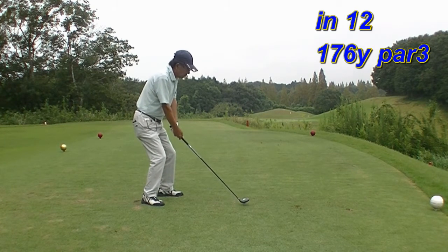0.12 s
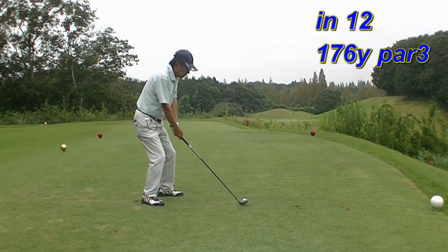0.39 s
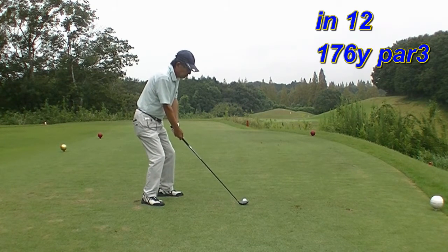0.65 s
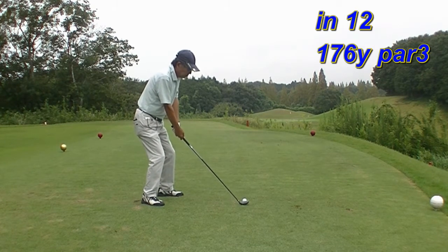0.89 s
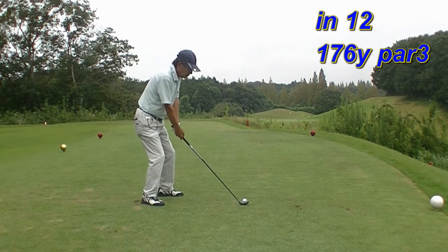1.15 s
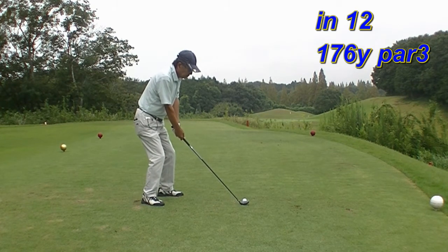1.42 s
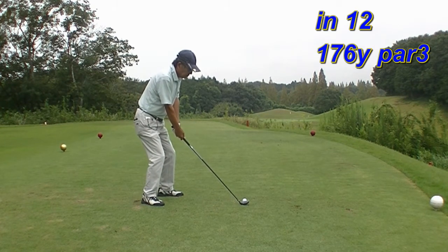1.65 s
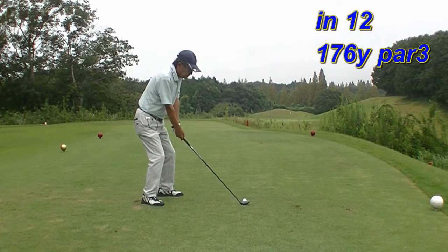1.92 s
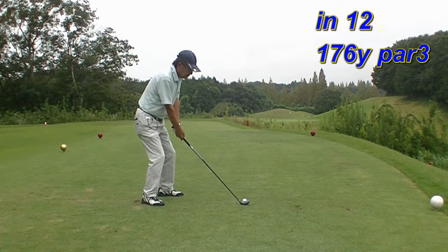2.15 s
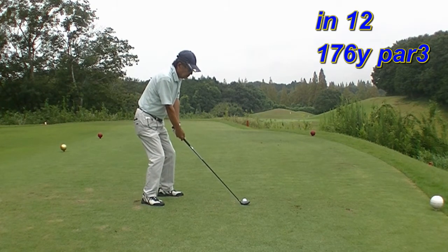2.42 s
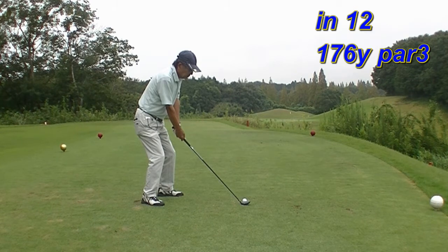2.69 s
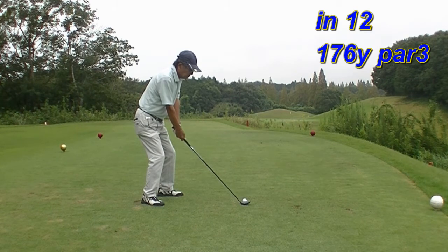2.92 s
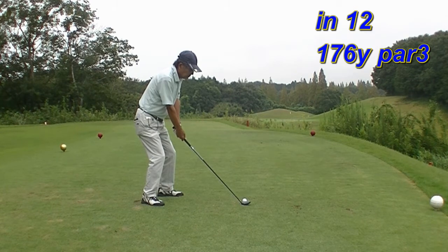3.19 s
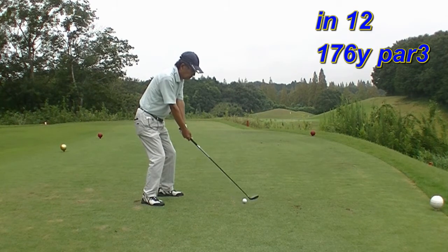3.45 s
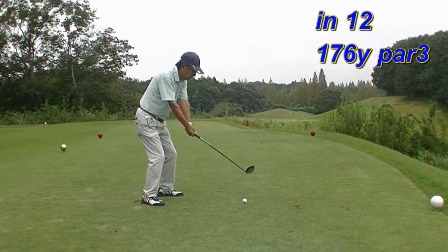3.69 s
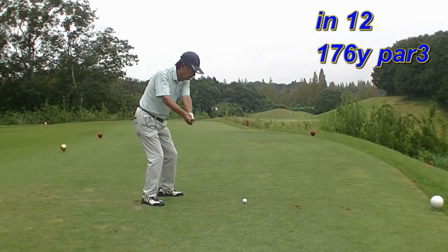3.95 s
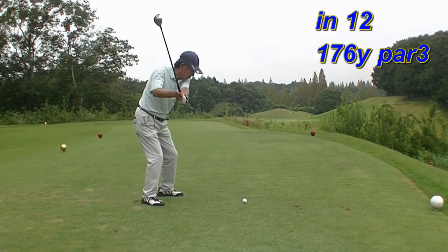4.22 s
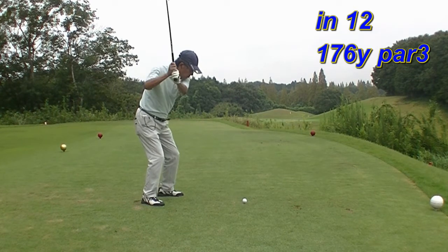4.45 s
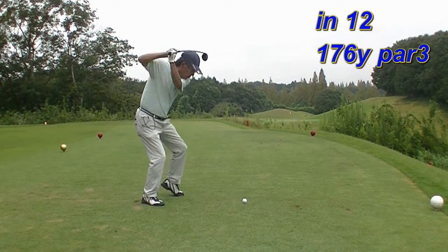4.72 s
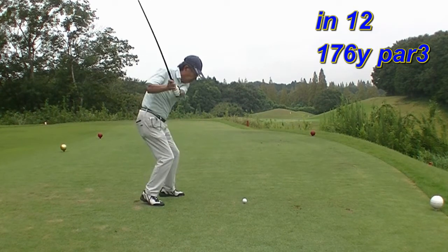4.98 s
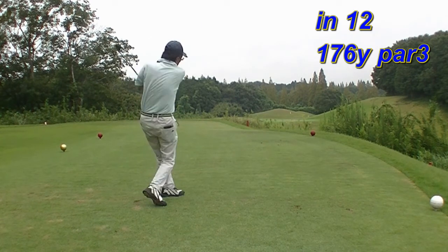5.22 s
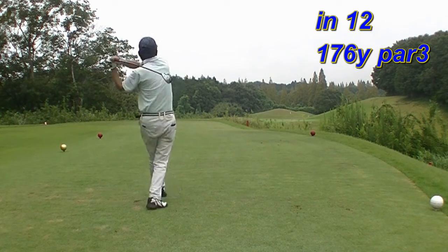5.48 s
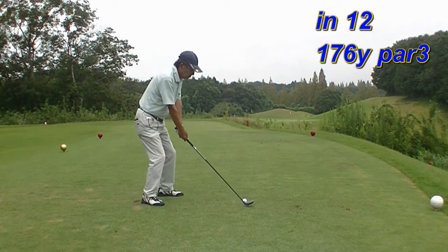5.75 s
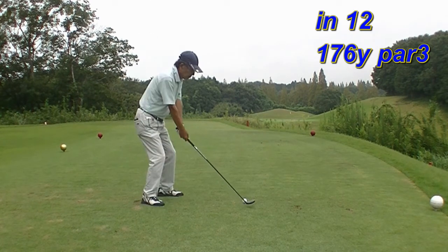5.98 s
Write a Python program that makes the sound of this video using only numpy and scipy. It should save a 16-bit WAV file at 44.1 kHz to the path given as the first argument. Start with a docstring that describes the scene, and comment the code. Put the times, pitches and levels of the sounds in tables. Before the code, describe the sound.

Quiet outdoor insect chirring fills a wide stereo space: blurred distant cicadas, a nearer trilling cricket that starts after a second and stops before the swing, and occasional faint bird chirps. Two loud clicks then come close together, first a hard snap, then a golf club hitting a ball with a brief swish, metal ring and grassy crackle. A grainy reflection from the trees fades before everything cuts off.

```python
"""A broad haze of cicadas opens over soft wind, with four crickets and a distant bird, at a golf tee in summer.
Insects and wind are shaped noise, pulsed tones and a drone; bird and far notes are short glides.
As the club comes down something snaps, squeaks and ticks close by: brief damped modes and a growing tone.
The head swishes, cracks on the ball and rings in decaying modes; noise bursts give turf crackle and the
tree line's scatter. Then everything cuts to silence."""
import sys
import numpy as np
from scipy import signal
from scipy.io import wavfile
from scipy.ndimage import uniform_filter1d

SR = 44100
rng = np.random.default_rng(int(sys.argv[2]) if len(sys.argv) > 2 else 0)


def inscribe(sig):
    """Save sig as 16-bit PCM at rate SR to the path in sys.argv[1].

    A 1-D sig is mono; a 2-D sig holds one channel per row.
    Samples are clipped to [-1, 1] before scaling.
    """
    pcm = np.round(np.clip(np.atleast_2d(sig).T, -1, 1) * 32767)
    wavfile.write(sys.argv[1], SR, pcm.astype(np.int16))


def magnitude_from_level(level_db):
    """Linear magnitude for a level in decibels (20 dB per decade)."""
    exponent = np.asarray(level_db, float) / 20
    return 10 ** exponent


N = 269886  # length in samples
SNAP_S, STRIKE_S, CUT_S = 5.0137, 5.1523, 5.677
BINS_HZ = np.fft.rfftfreq(512, 1 / SR)[:, None]  # the bands of every noise
FRAMES_S = np.arange(N // 128 + 5) * 128 / SR  # and its time steps


def read(points, hz):
    """Reads a spectrum table on a log-frequency axis."""
    f, value = np.transpose(points)
    return np.interp(np.log(hz + 1), np.log(f + 1), value)


def evened(x):
    """Scales to rms 1."""
    return x / np.sqrt(np.mean(x ** 2) + 1e-20)


def add(mix, s, sound):
    """Mixes a two-channel sound in at s seconds."""
    part = mix[:, round(s * SR):][:, :sound.shape[1]]
    part += sound[:, :part.shape[1]]


def drift(span_s, channels=1):
    """Slow random wander of rms 1: noise averaged twice over span_s."""
    span = int(span_s * SR)
    once = uniform_filter1d(rng.standard_normal((channels, N)), span)
    return evened(uniform_filter1d(once, span))


def noise(field_db, same):
    """Two-channel noise of rms 1 from a dB field of bands by frames; same is the left-right likeness."""
    a, b, c, d = rng.standard_normal((len(FRAMES_S), 257, 4)).T
    same = np.clip(same, -1, 1)
    left = a + 1j * b
    right = same * left + np.sqrt(1 - same ** 2) * (c + 1j * d)
    bands = np.array([left, right]) * magnitude_from_level(field_db)
    return evened(signal.istft(bands, nperseg=512, noverlap=384)[1][:, :N])


def tone(hz, level, blur):
    """A sine of the given rms level with a wavering phase per ear."""
    phase = 2 * np.pi * np.cumsum(hz * np.ones(N)) / SR
    return np.sqrt(2) * level * np.sin(phase + blur * drift(0.012, channels=2))


def envelope(shape, blow_s):
    """Fades in, moves at a steady dB rate to its turn, then falls quickly at first and slowly later."""
    start, attack, growth_db, peak, peak_db, knee, fall_db = shape
    t = np.arange(N) / SR - blow_s
    growth = growth_db * np.clip(t - peak, start - peak, 0)
    fall = fall_db * np.log10(1 + np.maximum(t - peak, 0) / knee)
    return np.clip((t - start) / attack, 0, 1) ** 2 * magnitude_from_level(peak_db + growth - fall)


def gust(shape, colour, same):
    """Coloured noise under an envelope around the strike."""
    return envelope(shape, STRIKE_S) * noise(read(colour, BINS_HZ), same)


def dying(t, t60):
    """Metal: struck at once, then exponential decay."""
    return (1 - np.exp(-t / .00014)) ** 2 * magnitude_from_level(-60 * t / t60)


def damped(t, length):
    """A held, soft-backed part: one swell and it is over."""
    return np.sin(np.pi * np.minimum(t / length, 1) ** 0.55) ** 2


def ring(modes, shape, lead, echo_s, echo_db, echo_hz):
    """Modes under their envelopes, plus a duller bounce off the turf."""
    t = np.arange(SR // 3) / SR
    side = np.array([[.5], [-.5]])
    direct = np.zeros((2, len(t)))
    for k, (hz, db, span, pan_db) in enumerate(modes):
        wave = np.sin(2 * np.pi * hz * t + read(lead, hz) * side)
        # neighbouring modes start in opposite sense
        direct += (-1) ** k * magnitude_from_level(db + pan_db * side) * shape(t, span) * wave
    dull = signal.lfilter(*signal.butter(2, echo_hz, fs=SR), direct)
    return direct + magnitude_from_level(echo_db) * np.roll(dull, round(echo_s * SR), axis=1)


# The club head's ring. Each row: pitch in Hz, level in dB, 60 dB decay time in seconds, left minus right in dB.
HEAD = [(240, -29, .011, 5), (2300, -40, 0.043, 0), (4790, -19, 0.007, -2.5), (5920, -32, .06, 0),
        (7065, -22.5, 0.035, 3), (7915, -19.5, 0.035, 0), (10250, -26.5, .025, -4),
        (11725, -29.5, .07, -4.5), (12300, -29, .025, -1.5), (15265, -20, .016, 2)]
# The crack while ball and face touch. Each row: pitch in Hz, level in dB, length in seconds, left minus right in dB.
CRACK = [(550, -30, .0025, 1), (2050, -17.5, .0012, -.5), (4200, -24, .001, -1), (7750, -5, .0013, 1.5),
         (11700, -13.5, .0011, -2), (14300, -23, .0008, 1)]
# Stereo phase of both. Each row: frequency in Hz, lead of the left in radians.
HEAD_LEAD = [(200, 2.5), (800, 1.5), (2000, 0.35), (8000, .6), (15000, .8)]


def strike():
    """Impact drives very short damped contact modes and the longer modes of the metal head."""
    out = np.zeros((2, N))
    add(out, STRIKE_S, ring(HEAD, dying, HEAD_LEAD, 0.0013, -16, 9000))
    add(out, STRIKE_S, ring(CRACK, damped, HEAD_LEAD, 0.0013, -10, 9000))
    return out


# The longest ring. In order: start in seconds from the strike, attack in seconds, slope to the turn in dB per
# second, turn in seconds from the strike, level there in dB, knee in seconds, fall in dB per decade.
SING = (.012, .005, -100, .025, -34, .004, 22)
SING_HZ, SING_HZ_PER_S = 5960, 1500


def sing():
    """The longest ring, heard as the face swings round: a tone that glides up for a tenth of a second."""
    since_s = np.clip(np.arange(N) / SR - STRIKE_S, 0, .1)
    return tone(SING_HZ + SING_HZ_PER_S * since_s, envelope(SING, STRIKE_S), .22)


# The swish's envelope. In order: start in seconds from the strike, attack in seconds, growth in dB per second,
# peak in seconds from the strike, peak in dB, knee in seconds, fall in dB per decade.
SWISH = (-.062, .02, 600, -.004, -39, .03, 62)
# Its colour. Each row: frequency in Hz, relative density in dB per Hz.
SWISH_COLOUR = [(60, -6), (170, 4), (450, 2), (900, -3), (2000, -2.5), (6000, -5), (16000, -7)]
# Its width. Each row: frequency in Hz, left-right likeness from -1 to 1.
SWISH_SAME = [(100, -.7), (400, -.3), (1500, .45), (15000, .45)]


def swish():
    """Air torn by the club: noise that grows steeply into the strike."""
    return gust(SWISH, SWISH_COLOUR, read(SWISH_SAME, BINS_HZ))


# The snap, hard and dry. Each row: pitch in Hz, level in dB, length in seconds, left minus right in dB.
SNAP = [(220, -39, 0.005, 7.5), (2400, -27, .0016, 3), (3370, -14, 0.0026, 4.5), (4430, -12, 0.0026, -3.5),
        (7680, -4.5, 0.0012, 2.5), (11300, -23, .001, -2), (14600, -33, .003, 0.5)]
# Stereo phase of snap and ticks. Each row: frequency in Hz, lead of the left in radians.
SNAP_LEAD = [(300, 2.49), (2000, 0.295), (4400, 0.44), (8000, .3), (15000, .9)]


def snap():
    """Something snaps close by: heavily damped modes, each over in milliseconds."""
    out = np.zeros((2, N))
    add(out, SNAP_S, ring(SNAP, damped, SNAP_LEAD, 0.0037, -15, 2800))
    return out


# The squeak's envelope. In order: start in seconds from the snap, attack in seconds, growth in dB per second,
# peak in seconds from the snap, peak in dB, knee in seconds, fall in dB per decade.
SQUEAK = (-.0038, .0008, 2600, .0002, -18, .002, 50)


def squeak():
    """A squeak grows into the snap: one high tone with a slightly wavering phase."""
    return tone(6600, envelope(SQUEAK, SNAP_S), .2)


# Small ticks after the snap. Each row: start in seconds, level in dB.
TICKS = [(5.0398, -61), (5.0745, -25), (5.0894, -35.5), (5.098, -45)]
# Their shared ring. Each row: pitch in Hz, relative level in dB, length in seconds, left minus right in dB.
TICK = [(4000, 1.5, 0.002, 0.96), (2800, -10.5, 0.0018, 0), (6300, -16.5, .002, 0)]


def ticks():
    """One small damped ring, repeated at different strengths."""
    out = np.zeros((2, N))
    tick = ring(TICK, damped, SNAP_LEAD, 0.0032, -15.5, 6000)
    for s, db in TICKS:
        add(out, s, magnitude_from_level(db) * tick)
    return out


# The turf's envelope. In order: start in seconds from the strike, attack in seconds, growth in dB per second,
# peak in seconds from the strike, peak in dB, knee in seconds, fall in dB per decade.
TURF = (0, .001, 100, .001, -26, .012, 65)
# Its colour. Each row: frequency in Hz, relative density in dB per Hz.
TURF_COLOUR = [(500, -19.5), (2500, -10.5), (5000, -3), (7500, -5), (9500, -14.5), (12000, -8.5),
               (16000, -14.5)]


def turf():
    """Crackle of grass and tee: a noise burst that falls fast, then lingers."""
    return gust(TURF, TURF_COLOUR, .4)


# The tree line's envelope. In order: start in seconds from the strike, attack in seconds, growth in dB per
# second, peak in seconds from the strike, peak in dB, knee in seconds, fall in dB per decade.
TREES = (.066, .006, 110, .1, -40.5, .3, 75)
# Its colour. Each row: frequency in Hz, relative density in dB per Hz.
TREES_COLOUR = [(300, -30), (1500, -14), (3000, -8.5), (5400, -3), (6000, 3.5), (6600, -4), (7400, -1.5),
                (8400, -6.5), (9800, -15.5), (15700, -21.5), (15900, -62)]


def trees():
    """Scatter from the trees: a late noise burst that single trunks make grainy."""
    return magnitude_from_level(2.2 * drift(.002)) * gust(TREES, TREES_COLOUR, .25)


# Near, high, thin and slow crickets. Each row: first stroke in seconds, last stroke in seconds,
# strokes per second, pitch in Hz, peak level in dB.
CRICKETS = [(.958, 4.25, 42.05, 5625, -47.2), (-.0155, 5.7, 37.5, 9050, -61.5),
            (.002, 2.7, 16.25, 7080, -66), (-.0154, 1.4, 16.225, 5500, -57.5)]
# Their wings. Each row: pitch sag in a stroke in Hz, sounding share, skew, unevenness in dB, phase blur in
# radians, left minus right in dB, level change by the end in dB.
WINGS = [(380, .52, .75, .8, .3, 1.5, 1.2), (900, .55, .8, 2.5, 1.8, -1.5, 0),
         (60, 1.0, .9, 2.5, .8, .1, -9), (60, .9, .9, 2.2, .32, .1, -3)]
# A cricket that sets in hurries, then settles; it starts flat and soft.
HURRY_PER_S, SETTLE_S = 2.3, .65  # extra strokes per second at first, settling time
FLAT_HZ, SOFT_DB, WARM_S = 120, -8.5, .3


def cricket(song, wing, sets_in):
    """Each wing stroke is a short tone whose pitch sags; leaves and distance blur its phase per ear."""
    first_s, last_s, per_s, hz, db = song
    sag_hz, share, skew, uneven_db, blur, pan_db, tire_db = wing
    t = np.arange(N) / SR - first_s
    hurry = sets_in * HURRY_PER_S * SETTLE_S * (1 - np.exp(-t / SETTLE_S))
    strokes = per_s * t + hurry
    cold = sets_in * np.exp(-np.maximum(t, 0) / WARM_S)
    which = np.maximum(np.round(strokes).astype(int), 0)
    start = rng.random(300)[which]  # every stroke starts at a phase of its own
    size = rng.standard_normal(300)[which]
    place = np.clip((strokes - which) / share + .5, 0, 1)  # 0 to 1 across one stroke
    stroke = np.sin(np.pi * place ** skew) * (t < last_s - first_s)  # quick rise, slower fall
    pitch_hz = hz - FLAT_HZ * cold + sag_hz * (.5 - place)
    turns = start + np.cumsum(pitch_hz) / SR
    level_db = db + SOFT_DB * cold + tire_db * np.clip(t / (last_s - first_s), 0, 1) ** 3
    level = magnitude_from_level(level_db + uneven_db * size + pan_db * np.array([[.5], [-.5]]))
    return level * stroke * np.sin(2 * np.pi * turns + blur * drift(0.0037, channels=2))


def crickets():
    """Four singers; only the near one sets in, the rest are long under way."""
    return sum(cricket(song, wing, k == 0) for k, (song, wing) in enumerate(zip(CRICKETS, WINGS)))


# A bird's rising whistles. Each row: start in seconds, length in seconds, lowest pitch in Hz, level in dB.
BIRD = [(.356, .02, 2870, -61.5), (.713, .04, 2200, -54.5), (1.488, .03, 2600, -59.5),
        (1.709, .039, 2170, -55), (2.22, .035, 2270, -64), (2.603, .024, 2720, -58.5),
        (2.698, .042, 2100, -58), (3.743, .044, 2080, -59), (4.797, .03, 2280, -56.5),
        (4.854, .02, 2470, -62)]
# Faint far notes that barely rise. Each row: start in seconds, length in seconds, lowest pitch in Hz, level in dB.
NOTES = [(1.777, .089, 2650, -65), (2.83, .07, 3550, -64.5), (2.95, .03, 3780, -62.5),
         (5.565, .055, 1630, -69), (5.576, .036, 390, -66.5)]
BIRD_OCTAVES_PER_S, NOTE_OCTAVES_PER_S, BEND = 13, 2.2, 1.5


def whistles(rows, octaves_per_s, rough=.22):
    """Short upward glides that steepen, smeared by distance."""
    out = np.zeros((2, N))
    for s, length, from_hz, db in rows:
        u = np.linspace(0, 1, int(length * SR))
        pitch_hz = from_hz * 2 ** (octaves_per_s * length * u ** BEND)
        glide = np.sin(2 * np.pi * np.cumsum(pitch_hz) / SR)
        swell = np.sqrt(np.sin(np.pi * u ** 1.5))
        add(out, s, magnitude_from_level(db) * np.sqrt(2) * swell * glide * np.ones((2, 1)))
    return out * (1 + rough * drift(0.0034, channels=2))


# The far chorus. Each row: frequency in Hz, relative density in dB per Hz.
HAZE = [(1000, -38.5), (1450, -20), (1800, -9), (2400, -5.5), (3300, -8), (4400, -8), (5000, -2), (5900, 0),
        (6700, -7.5), (7300, -12.5), (8300, -5.5), (9000, -5), (9350, -13), (9800, -19), (13000, -19.5),
        (15700, -23.5), (15850, -70.5)]
HAZE_DB = -50.5  # rms
# Stereo width of haze and wind. Each row: frequency in Hz, left-right likeness from -1 to 1.
SAME = [(60, -0.05), (130, -0.02), (290, -0.34), (640, -0.52), (1410, -0.11), (3100, 0.42), (6820, 0.44),
        (15000, -0.097)]
# Stereo balance. Each row: frequency in Hz, left minus right in dB.
LEAN = [(60, -3), (180, 0.5), (550, -0.5), (1650, 2), (4970, 0), (15000, -3.5)]
# Swells in the chorus. Each row: centre in seconds, lift in dB, length in seconds, pitch in Hz, width in Hz.
SWELLS = [(.68, 4, .2, 3200, 2500), (1.721, 2.5, .3, 3210, 2510), (2.8, 6, .46, 3900, 700),
          (4.438, 5, .15, 3000, 4000), (4.43, 9.5, .18, 10000, 1500)]
# A thin buzz about once a second. Each row: centre in seconds, lift in dB.
BUZZES = [(1.84, 7.5), (2.84, 9), (3.851, 9), (4.9, 8)]
# Shared by every buzz: length in seconds, pitch in Hz, width in Hz.
BUZZ = (.14, 7650, 800)
# The treble brightens briefly. Each row: centre in seconds, lift in dB.
SHEENS = [(.9, 3.5), (2.222, 6), (2.933, 2), (3.298, 1.5), (3.94, 2), (4.4, 5)]
# Shared by every sheen: length in seconds, pitch in Hz, width in Hz.
SHEEN = (.15, 14000, 4600)


def haze(patchy_db=1.4):
    """Countless far insects blur into patchy noise; single voices swell out of it."""
    grain = rng.standard_normal((len(FRAMES_S), 257))
    patches = evened(uniform_filter1d(uniform_filter1d(grain, 30, 0), 6, 1)).T
    rows = SWELLS + [row + BUZZ for row in BUZZES] + [row + SHEEN for row in SHEENS]
    swell_db = 0
    for s, db, length, mid_hz, width in rows:
        in_time = (2 * (FRAMES_S - s) / length) ** 2
        in_pitch = (2 * (BINS_HZ - mid_hz) / width) ** 2
        swell_db = swell_db + db * np.exp(-in_time - in_pitch)
    lean_db = read(LEAN, BINS_HZ) * np.array([.5, -.5])[:, None, None]
    field_db = read(HAZE, BINS_HZ) + patchy_db * patches + swell_db + lean_db
    return magnitude_from_level(HAZE_DB) * noise(field_db, read(SAME, BINS_HZ))


DRONE_HZ, DRONE_DB = 5085, -70
DRONE_UP_DB, DRONE_TOP_S, DRONE_SWELL_S = 5, 1.7, 1.5


def drone():
    """A thin held tone of wavering phase that swells once."""
    t = np.arange(N) / SR
    swell_db = DRONE_UP_DB * np.exp(-(2 * (t - DRONE_TOP_S) / DRONE_SWELL_S) ** 2)
    return tone(DRONE_HZ, magnitude_from_level(DRONE_DB + swell_db), .9)


# Soft wind. Each row: frequency in Hz, relative density in dB per Hz.
WIND = [(35, -47), (60, -19.5), (221, -3), (394, 2), (629, -3.5), (949, -4.5), (1390, -7), (1600, -5.5),
        (2080, -32.5), (3520, -120)]
WIND_DB = -66  # rms before its slow wander
# The rumble is lumpy and picks up late.
GUST_S, GUST_RISE_S, GUST_DB, LUMPY_DB, RUMBLE_HZ = 4.2, .25, 5, 4, 150


def wind():
    """Low soft rumble from shaped noise, partly opposite in the two microphone ports."""
    lumps = evened(uniform_filter1d(rng.standard_normal(len(FRAMES_S)), 24))
    late_db = GUST_DB * (.5 + .5 * np.tanh((FRAMES_S - GUST_S) / GUST_RISE_S))
    rumble_db = (late_db + LUMPY_DB * (lumps - 1)) / (1 + (BINS_HZ / RUMBLE_HZ) ** 4)
    level = magnitude_from_level(WIND_DB + 1.1 * drift(0.087))
    return level * noise(read(WIND, BINS_HZ) + rumble_db, read(SAME, BINS_HZ))


def scene():
    """The swing among insects, bird and wind."""
    mix = strike() + sing() + swish()
    mix += snap() + squeak() + ticks()
    mix += turf() + trees()
    mix += crickets() + whistles(BIRD, BIRD_OCTAVES_PER_S) + whistles(NOTES, NOTE_OCTAVES_PER_S)
    return mix + haze() + drone() + wind()


def roll_off(x):
    """The treble ends steeply here."""
    return signal.sosfilt(signal.butter(12, 16970, fs=SR, output="sos"), x)


def record(dry):
    """The microphone drops deep bass and the top; the edit cuts the sound."""
    low_cut = signal.sosfilt(signal.butter(2, 90, "high", fs=SR, output="sos"), dry)
    top_cut = signal.firwin(129, 16300, window=("kaiser", 8), fs=SR)[None]
    band = signal.oaconvolve(low_cut, top_cut, "same")
    finished = band * (np.arange(N) < CUT_S * SR)
    return roll_off(finished)


dry = scene()
out = record(dry)
inscribe(out)
```